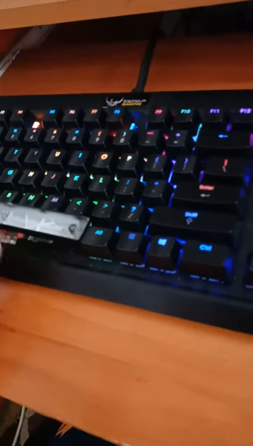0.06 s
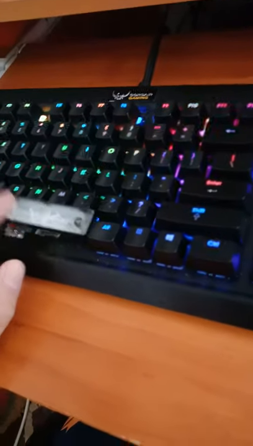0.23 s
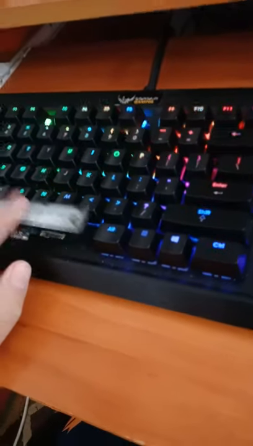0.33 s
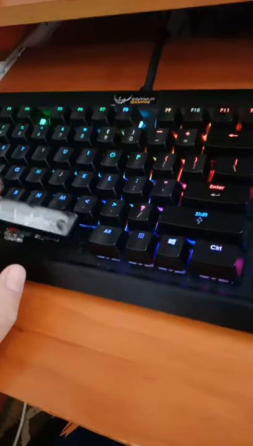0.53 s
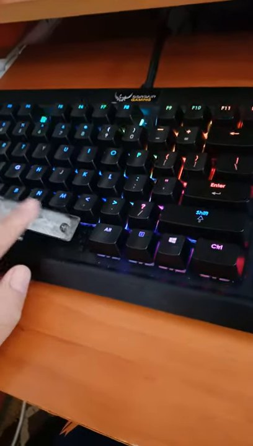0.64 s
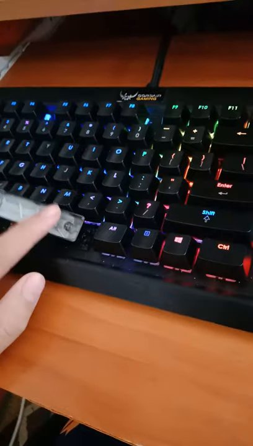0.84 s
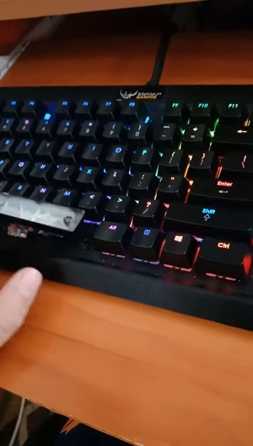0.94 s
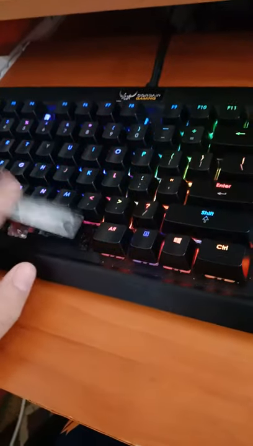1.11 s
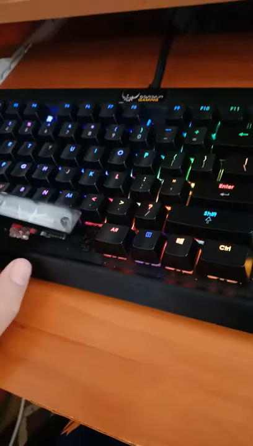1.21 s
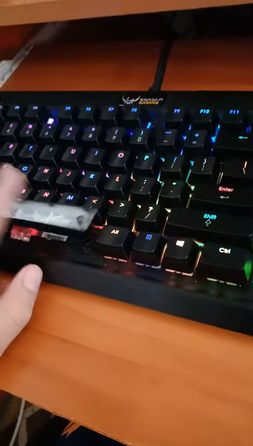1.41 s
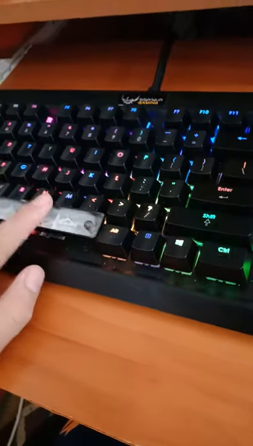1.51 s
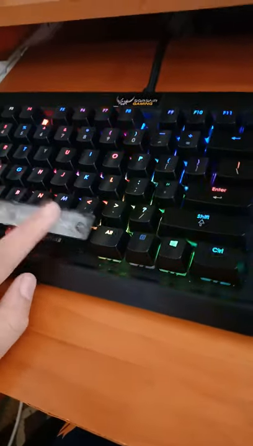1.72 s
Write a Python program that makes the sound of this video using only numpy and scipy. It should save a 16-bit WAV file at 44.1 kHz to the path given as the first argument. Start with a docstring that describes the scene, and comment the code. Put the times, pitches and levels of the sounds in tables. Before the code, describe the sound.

A loose plastic spacebar clacks on a mechanical keyboard as a finger flicks it about seven times in quick succession. It rattles between landings, with light knocks through the wooden desk, heard close in a quiet room.

```python
"""A loose plastic spacebar, flicked by a finger, on a mechanical keyboard on a wooden desk.
Each contact rings the hollow keycap, its stems, its hard edges and the case, with a snap and a ping;
the bar rattles between clacks. Full landings ring the backplate and knock the desk; finger pushes thud.
A close stereo microphone hears the quiet room's low rumble and short tail."""
import sys
import numpy as np
from scipy import signal
from scipy.fft import rfft, irfft
from scipy.io import wavfile
from scipy.ndimage import uniform_filter1d, minimum_filter1d

SR = 44100
rng = np.random.default_rng(int(sys.argv[2]) if len(sys.argv) > 2 else 0)


def to_wav(s):
    """Save 16-bit WAV."""
    ch = np.atleast_2d(s).T  # columns
    pcm = np.round(np.clip(ch, -1, 1) * 32767)  # PCM
    wavfile.write(sys.argv[1], SR, pcm.astype(np.int16))


N = 77175


def amp(db):
    """Decibels to gain."""
    return 10 ** (np.asarray(db) / 20)


def unit(x):
    """Scale to a total energy of 2, one per stereo channel."""
    return x / np.sqrt(np.sum(x ** 2) / 2 + 1e-20)


def butter(x, hz, kind, order=2):
    """Causal Butterworth filter."""
    return signal.sosfilt(signal.butter(order, hz, kind, fs=SR, output="sos"), x)


def envelope(t, rise_s, t60_s):
    """Exponential rise and decay."""
    return (1 - np.exp(-t / rise_s)) * amp(-60 * t / t60_s)


def stereo_noise(count, shared):
    """White noise; `shared` is the power fraction common to both channels."""
    white = rng.standard_normal((3, count))
    return np.sqrt(shared) * white[2] + np.sqrt(1 - shared) * white[:2]


def add(out, time_s, x, db, contact_s=0.005):
    """Mix in a unit-energy sound; `db` is its level referred to one contact time."""
    start = int(time_s * SR)
    out[:, start:start + x.shape[1]] += amp(db) * np.sqrt(contact_s * SR) * x[:, :N - start]


# (frequency [Hz], relative density [dB])
RUMBLE_SPECTRUM = [(25, -24), (50, -8), (86, -0.5), (120, -4.5), (250, -3), (400, 0), (520, -8.5),
                   (700, -8), (1500, -12.5), (4000, -18), (7500, -33), (15500, -31)]

def room_rumble(rms_db=-59.5):
    """Steady low rumble and faint hiss of the room."""
    hz, db = np.transpose(RUMBLE_SPECTRUM)
    bins_hz = np.maximum(np.fft.rfftfreq(N, 1 / SR), 1)
    gain = amp(np.interp(np.log(bins_hz), np.log(hz), db))
    rumble = irfft(rfft(stereo_noise(N, shared=0.26)) * gain, N)
    return amp(rms_db) * rumble / rumble.std()


def struck_part(times_s, levels_db, favoured_hz, modes, lowpass_hz, left_lag_ms):
    """Each touch, a click plus dying chatter, rings one part; modes near the favoured pitch are lifted."""
    stagger_s = 0.0014  # the bar seats unevenly, so modes start one after another
    chatter_db, lift_db, lift_octaves = 1, 11.5, 0.083
    count = len(times_s)
    hits = np.zeros((count, 2, SR // 6))
    t = np.arange(SR // 25) / SR
    fade = envelope(t, rise_s=stagger_s, t60_s=0.048)
    for hz, db, t60_s, pan_db in modes:
        force = np.zeros_like(hits)
        for touch in force:
            touch[:, :len(t)] = amp(chatter_db) * unit(stereo_noise(len(t), shared=0.41) * fade)
        click_at = (rng.random(count) * stagger_s * SR).astype(int)
        force[np.arange(count), :, click_at] += 1
        radius = amp(-60 / (t60_s * SR))
        feedback = [1, -2 * radius * np.cos(2 * np.pi * hz / SR), radius ** 2]
        rings = signal.lfilter([1, 0, -1], feedback, force) * amp([[pan_db / 2], [-pan_db / 2]])
        lifts_db = lift_db * np.exp(-(np.log2(hz / favoured_hz) / lift_octaves) ** 2)
        hits += np.array([amp(db + lift) * unit(ring) for lift, ring in zip(lifts_db, rings)])
    out = np.zeros((2, N))
    for time_s, db, hit in zip(times_s, levels_db, hits):
        add(out, time_s, unit(hit), db)
    out = butter(out, lowpass_hz, "low", order=4)
    left, right = butter(out, modes[0][0] / 2, "high")
    n = np.arange(N)
    return np.array([np.interp(n - left_lag_ms * SR / 1000, n, left), right])


# (time [s], keycap [dB], stems [dB], edge [dB], case [dB], snap [dB], favoured pitch [Hz])
BAR_CONTACTS = [ (.2018, -31, -23, -37, -26, -51, 3780), (.2048, -18, -31, -21.5, -24, -49, 3400),
                (0.2087, -14.5, -17, -26.5, -21.5, -57, 1855), (.3042, -38, -42, -42, -66, -76, 4100),
                (0.3404, -72, -34.5, -43, -110, -92.5, 3600), (0.3449, -26.5, -45, -37, -32.5, -73, 2173),
                (0.3711, -72.5, -32, -36, -33, -76, 4050), (0.3731, -30.5, -23, -59, -33, -77, 3460),
                (.382, -33, -47, -43, -41, -67, 2220), (0.4033, -19, -22, -25, -24, -53, 1970),
                (.4068, -57, -30, -19.5, -59, -43, 3970), (.4126, -12.5, -19, -19.5, -31, -46.5, 2094),
                (0.524, -36.5, -32, -39.5, -39, -84, 3360), (0.5685, -46, -48, -36, -40, -64, 4860),
                (0.579, -40, -35, -38, -44, -68, 4230), (0.5859, -30.5, -20.5, -37, -35, -66, 3470),
                (0.6222, -29.5, -29, -36, -28.5, -66, 2165), (.639, -33.5, -27, -34, -39, -64, 3760),
                (0.6456, -22.5, -29, -18, -20.5, -55, 4870), (.653, -20.5, -23.5, -49, -19.5, -57, 765),
                (0.7297, -39.5, -40, -33.5, -41, -73, 3950), (.771, -32.5, -32, -42.5, -32.5, -75, 3200),
                (0.781, -29.5, -32.5, -76, -55, -79, 2040), (0.788, -32.5, -41, -54, -50, -85, 2300),
                (0.7978, -34, -28.5, -51, -32.5, -72, 3400), (.816, -37, -39.5, -54, -31.5, -74, 2100),
                (0.8253, -23.5, -27, -20.5, -27, -43.5, 5370), (.832, -26.5, -23, -44, -23, -64, 1000),
                (0.844, -34, -21, -32, -31.5, -52, 3410), (.8552, -19, -16, -21.5, -22, -52.5, 3430),
                (.928, -56, -40, -53, -52, -73, 3700), (.961, -38.5, -29, -46, -64, -73, 3730),
                (.9635, -27, -36, -24, -28, -58, 2090), (.969, -43, -34.5, -34, -32, -50.5, 4440),
                (.994, -42.5, -42, -42, -37.5, -68, 3700), (1.036, -43, -50, -77, -63, -83, 2200),
                (1.0907, -21, -23, -19.5, -22.5, -47.5, 4204), (1.1851, -38.5, -36, -39.5, -36, -72, 2240),
                (1.202, -37, -34, -36, -35, -57.5, 3640), (1.232, -44, -42, -48.5, -46, -78, 2160),
                (1.2748, -29, -20, -31.5, -33, -59, 3410), (1.305, -31, -42, -45, -46, -71, 3650),
                (1.314, -24, -17, -18, -27.5, -51, 3450), (1.3193, -24.5, -47, -23, -30, -45, 2030),
                (1.41, -45.5, -40, -39, -35, -77, 965), (1.4225, -40, -40, -49, -64, -82, 3630),
                (1.431, -36, -34, -46.5, -34, -73, 3120), (1.45, -36.5, -42.5, -48.5, -34, -75, 1850),
                (1.499, -32, -34, -52.5, -34, -70.5, 1940), (1.526, -26.5, -32.5, -31.5, -28, -58, 3780),
                (1.5305, -32, -20.5, -24, -61, -52.5, 3750), (1.5333, -10, -17.5, -30, -20.5, -54, 2133),
                (1.5471, -23, -27.5, -34, -26, -65.5, 2140), (1.622, -40, -35.5, -48, -43.5, -70.5, 2040),
                (1.6275, -42, -52, -37.5, -65, -78, 4450), (1.656, -41.5, -34.5, -49, -35, -93, 3650),
                (1.673, -35.5, -41, -36.5, -35.5, -71, 3970)]
# each part: (frequency [Hz], level [dB], t60 [s], left minus right [dB])
KEYCAP_MODES = [(1506, -4.5, 0.022, -9), (1694, -11.5, 0.034, 9), (2000, 1, 0.0084, 5.5),
                (2260, -0.5, 0.0084, 1.5), (2267, -10.5, 0.072, 4), (2296, -3.5, 0.0067, 18.5)]
STEM_MODES = [(2964, 0, 0.0066, 0.013), (3296, -6, 0.032, 0.015), (3579, -1.5, 0.0083, 0.0095)]
EDGE_MODES = [(3983, -1, 0.0083, 3), (4530, -2.5, 0.022, -6.5), (5266, 2.5, 0.0067, -0.5),
              (5960, -1, 0.0049, -37), (6910, -3.5, 0.0083, -46)]
CASE_MODES = [(426, -19, 0.058, 3), (701, -17, 0.053, -20), (816, -9, 0.026, -2), (1035, -4, 0.029, -4.5),
              (1180, -5.5, 0.012, -9.5), (1370, -8, .015, -14.5)]

def spacebar_clacks():
    """Every contact rings keycap, stems, edges and case together."""
    times_s, cap_db, stems_db, edge_db, case_db, _, hz = np.transpose(BAR_CONTACTS)
    keycap = struck_part(times_s, cap_db, hz, KEYCAP_MODES, lowpass_hz=4800, left_lag_ms=0.099)
    stems = struck_part(times_s, stems_db, hz, STEM_MODES, lowpass_hz=4320, left_lag_ms=0.21)
    edges = struck_part(times_s, edge_db, hz, EDGE_MODES, lowpass_hz=4680, left_lag_ms=0.24)
    case = struck_part(times_s, case_db, hz, CASE_MODES, lowpass_hz=760, left_lag_ms=0.3)
    return keycap + stems + edges + case


def edge_snaps(band_hz=(5040, 11900)):
    """A hard edge gives a brief, bright noise burst at each contact."""
    t, out = np.arange(SR // 15) / SR, np.zeros((2, N))
    shape = envelope(t, rise_s=0.00066, t60_s=0.032)
    for time_s, *_, snap_db, _ in BAR_CONTACTS:
        burst = stereo_noise(len(t), shared=0.067) * shape
        add(out, time_s, unit(butter(burst, band_hz, "band")), snap_db)
    return out


# rows case, keycap, stems, edge: (centre pitch [Hz], left minus right [dB])
PART_PITCHES = [(900, -10.5), (2100, 11), (3400, -7.5), (4600, 1)]

def contact_pings(trim_db=-5.5, rise_s=0.00036, t60_s=0.010, left_lag_ms=0.16, lowpass_hz=4350):
    """The struck spot pings at its favoured pitch; level and pan follow the parts nearest in pitch."""
    t, out = np.arange(SR // 20) / SR, np.zeros((2, N))
    t = np.maximum([t - left_lag_ms / 1000, t], 0)
    centres_hz, pans_db = np.transpose(PART_PITCHES)
    shape = (1 - np.exp(-t / rise_s)) ** 2 * amp(-60 * t / t60_s)
    for time_s, cap_db, stems_db, edge_db, case_db, _, hz in BAR_CONTACTS:
        pan_db = np.interp(hz, centres_hz, pans_db)
        level_db = np.interp(hz, centres_hz, [case_db, cap_db, stems_db, edge_db])
        ping = np.sin(2 * np.pi * hz * t) * shape * amp([[pan_db], [0]])
        add(out, time_s, unit(ping), level_db + trim_db)
    return butter(out, lowpass_hz, "low")


def thud(band_hz, t60_s):
    """A soft bump of low noise that swells and dies."""
    t = np.arange(SR // 3) / SR
    bump = stereo_noise(len(t), shared=0.91) * envelope(t, rise_s=0.019, t60_s=t60_s)
    return unit(butter(bump, band_hz, "band", order=3))


# (time [s], desk [dB], thud [dB], backplate [dB], backplate pitch [Hz])
BAR_LANDINGS = [(0.2113, -33, -39, -27, 999), (.413, -31, -51.5, -31, 732), (.653, -29, -44.5, -29, 757),
                (0.855, -35.5, -43, -29, 691), (1.095, -35.5, -44, -34, 906),
                (1.3207, -54, -48.5, -35.5, 917), (1.5326, -33, -40, -26.5, 731)]
# (frequency [Hz], level [dB], t60 [s], left minus right [dB])
DESK_MODES = [(204.6, -9, 0.19, -2), (336, 0.5, 0.2, -0.2), (452, 3.5, 0.15, 0.74)]

def bar_landings(plate_t60_s=0.053, plate_left_db=-8.5):
    """A full landing rings the backplate, knocks the desk top and leaves a thud."""
    times_s, desk_db, _, _, plate_hz = np.transpose(BAR_LANDINGS)
    out = struck_part(times_s, desk_db, plate_hz, DESK_MODES, lowpass_hz=1750, left_lag_ms=0.31)
    t = np.arange(SR // 6) / SR
    for time_s, _, thud_db, plate_db, hz in BAR_LANDINGS:
        plate = np.sin(2 * np.pi * hz * t) * amp(-60 * t / plate_t60_s) * amp([[plate_left_db], [0]])
        add(out, time_s, unit(butter(plate, [hz / 2, hz * 2], "band")), plate_db)
        add(out, time_s, thud(band_hz=(60.4, 333), t60_s=0.2), thud_db)
    return out


# (band centre [Hz], gain [dB], t60 [s])
TAIL_BANDS = [(150, -37, 0.42), (370, -12.5, 0.91), (790, -13.5, 0.54), (1480, -13.5, 0.36),
              (3170, -16.5, 0.36), (6700, -17, 0.4), (12800, -13.5, 0.29)]

def room_tail(x, delay_s=0.012, build_s=0.0037):
    """Diffuse reflections of a small room, decaying per octave band."""
    t, response = np.arange(SR // 2) / SR, 0
    build = 1 - np.exp(-np.maximum(t - delay_s, 0) / build_s)
    for hz, db, t60_s in TAIL_BANDS:
        noise = unit(stereo_noise(len(t), shared=0.067) * build * amp(-60 * t / t60_s))
        response += amp(db) * butter(noise, [hz / np.sqrt(2), hz * np.sqrt(2)], "band")
    return signal.fftconvolve(x, response, axes=1)[:, :N]


# (time [s], level [dB])
FINGER_PUSHES = [(.60, -55), (.79, -51), (.94, -46.5), (1.282, -49), (1.407, -51.5)]

def finger_pushes():
    """The fingertip pushes the bar and the keyboard gives with a soft thud."""
    out = np.zeros((2, N))
    for time_s, db in FINGER_PUSHES:
        add(out, time_s, thud(band_hz=(60.5, 464), t60_s=0.21), db)
    return out


def scene():
    """Keyboard and desk in the room."""
    body = spacebar_clacks() + edge_snaps() + bar_landings() + finger_pushes()
    pings = contact_pings()
    ping_send_db = -16  # pings stay mostly dry, so they sound short and leave no ringing tone in the room
    return body + pings + room_tail(body + amp(ping_send_db) * pings) + room_rumble()


def record(dry):
    """Fast peak limiter, then a steep low-pass."""
    ceiling, cutoff_hz = 0.95, 15700
    gain = ceiling / np.maximum(np.abs(dry).max(axis=0), ceiling)
    held_gain = minimum_filter1d(gain, size=129)
    smooth_gain = uniform_filter1d(held_gain, size=65)
    lowpass = signal.ellip(10, 0.1, 80, cutoff_hz, fs=SR, output="sos")
    return signal.sosfilt(lowpass, smooth_gain * dry)


dry = scene()
out = record(dry)
to_wav(out)
```